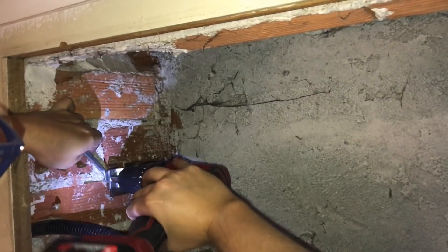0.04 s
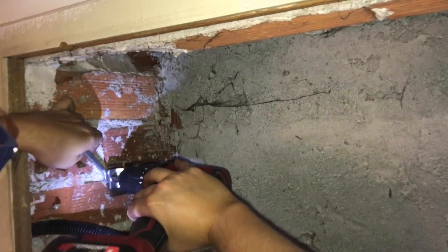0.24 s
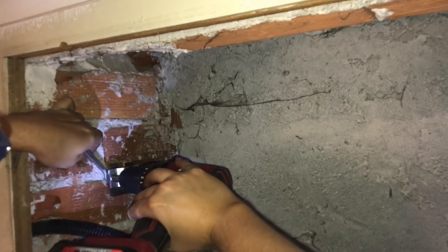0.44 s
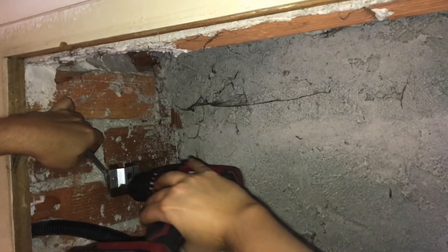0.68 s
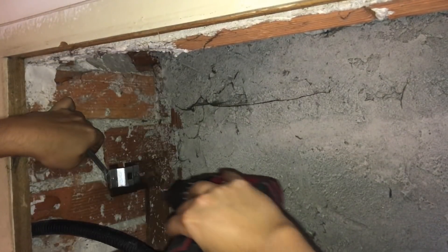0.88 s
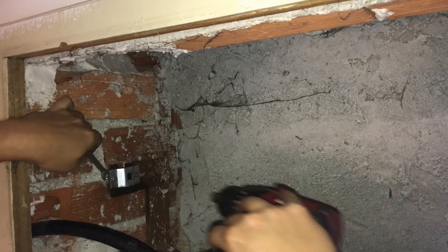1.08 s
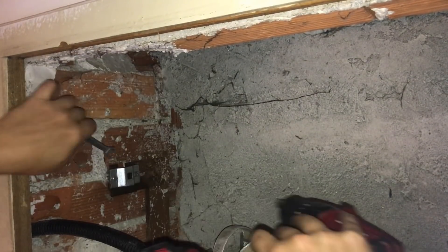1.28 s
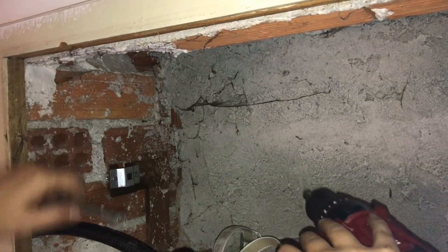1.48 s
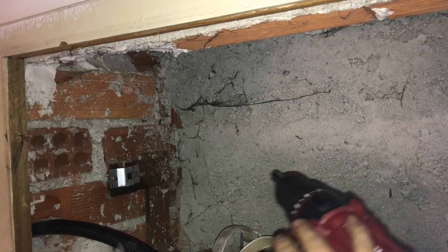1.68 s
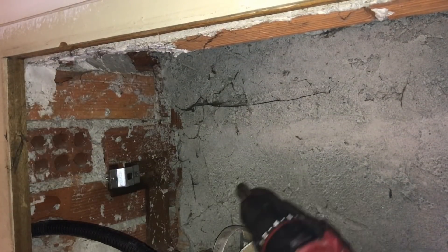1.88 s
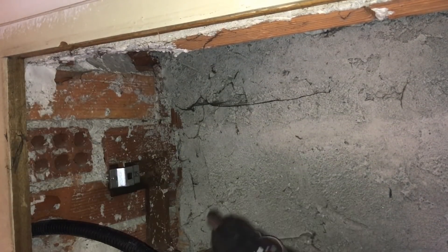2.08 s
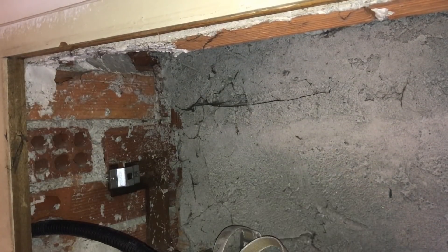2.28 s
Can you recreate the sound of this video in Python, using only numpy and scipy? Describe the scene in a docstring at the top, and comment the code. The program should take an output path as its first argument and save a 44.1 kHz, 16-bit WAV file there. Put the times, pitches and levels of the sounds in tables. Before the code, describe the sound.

Close up in a small bare room, a cordless impact driver rattles loudly for a moment and winds down with soft thuds. A screwdriver then clinks twice against a metal wall box, and tools knock and tap lightly.

```python
"""Impact driver on a metal wall box

A cordless driver whines, hammers a screw home for under half a second and runs down, then is pulled
away with dull bumps. A steel screwdriver clinks twice off the box, the driver's plastic body knocks,
and dry taps follow as the tools are put down: each hit is a noise crack over ringing modes.
Heard close up in a small bare masonry room with a low rumble."""
import sys
import numpy as np
from scipy import signal
from scipy.fft import rfft, irfft, next_fast_len
from scipy.io import wavfile
from scipy.ndimage import uniform_filter1d

SR = 44100
rng = np.random.default_rng(int(sys.argv[2]) if len(sys.argv) > 2 else 0)


def pcm_store(signal):
    """Save signal as 16-bit PCM."""
    levels = np.round(np.clip(np.atleast_2d(signal), -1, 1) * 32767)
    wavfile.write(sys.argv[1], SR, levels.astype(np.int16).T)


N = 108045

# hammer speed at full run: t/s, blow rate/Hz
BLOW_RATE = [(.2445, 100.6), (.289, 113.9), (.402, 131.8), (.474, 132.4), (.499, 111.8), (.564, 66.3),
             (.57, 60)]
# low modes of the wall: f/Hz, level/dB, t60/s
WALL_MODES = [(117, -15.5, 0.065), (200, -3.5, 0.07), (260.8, -7.5, 0.078), (350, -11, 0.084)]
# colour of a steel contact crack: f/Hz, level/dB
STEEL_CRACK = [(60, -44), (1000, -7.5), (3500, 0.5), (5000, -15.5), (6800, 4.5), (9000, 1), (11500, -4.5),
               (13500, -5), (16000, -6)]


def hammer():
    """The hammer crashes on the anvil and rebounds, thumping the wall; the loose bit chatters."""
    # strength of the blows: t/s, level/dB
    effort = [(.24, 0), (.3, 0), (.4, -1), (.47, -0.5), (.52, -2), (.57, -5)]
    # lone blows as the hammer catches and runs down: t/s, level/dB
    stray_blows = [(0.2112, 0.5), (0.2269, -4.5), (0.2317, -.5), (0.241, -1), (0.5461, -4), (0.575, -9),
                   (0.5833, -5.5), (0.5998, -21), (0.6081, -8)]
    # colour of one crash: f/Hz, level/dB
    crash_colour = [(40, -43), (170, -20.5), (620, -11.5), (1050, -15.5), (1300, -3.5), (1680, -10.5),
                    (2300, -3.5), (2800, -4), (3500, -1.5), (4950, -9), (5450, -3.5), (7400, -10.5),
                    (8600, -5), (10000, -13), (12000, -10.5), (15800, -18)]
    # modes of anvil and bit: f/Hz, level/dB, t60/s
    anvil_modes = [(1866, -6, 0.046), (2200, -10, 0.046), (2770, 1, 0.021), (3385, -5.5, 0.023),
                   (3785, -5.5, 0.018), (3970, -8, 0.026), (4340, -12.5, .025), (5500, -11, 0.01),
                   (6244, -11.5, 0.035), (8430, -8.5, .012)]
    rise_s, jitter_s, scatter_db = .0012, .00004, .8
    crash_db, rebound_db, anvil_db, wall_db = -12.4, -7, -18, -42.5
    repeat_share = .74  # part of the crash's power that is alike on every blow
    count, running = blow_count()
    times = np.interp(np.arange(int(count[-1]) + 1), count[running], np.flatnonzero(running) / SR)
    times += jitter_s * rng.standard_normal(len(times))
    blow_db = np.interp(times, *np.array(effort).T) + scatter_db * rng.standard_normal(len(times))
    # one softer, uneven chatter after each full-run blow
    lag_s = rng.uniform(.003, .0065, len(times))
    chatter_db = blow_db - 6 + 3 * rng.standard_normal(len(times))
    chatter = play(times + lag_s, undb(chatter_db), burst(0, rise_s / 2, fall_s=.0013))
    stray_s, stray_db = np.array(stray_blows).T
    times, gains = np.r_[times, stray_s], undb(np.r_[blow_db, stray_db])
    rebound = undb(rebound_db) * burst(.0051, rise_s / 2, fall_s=.0023)
    envelope = burst(0, rise_s, fall_s=.0023) + rebound
    repeated = np.sqrt(repeat_share) * play(times, gains, flatten(envelope * white()))
    fresh = np.sqrt(1 - repeat_share) * play(times, gains, envelope) * white()
    body = undb(anvil_db) * ring(anvil_modes) + undb(wall_db) * ring(WALL_MODES)
    crashes = colour(repeated + fresh + chatter * white(), crash_colour)
    return undb(crash_db) * crashes + play(times + rise_s / 2, gains, body)


def blow_count():
    """Running count of blows, and a gate that is open during the full run."""
    t = np.arange(N) / SR
    running = (t >= BLOW_RATE[0][0]) & (t <= BLOW_RATE[-1][0])
    return np.cumsum(curve(BLOW_RATE) * running) / SR, running


def housing_drone():
    """Steady hammering shakes the housing: clean harmonics that rise and swell with speed."""
    # housing harmonics: multiple of the blow rate, level/dB
    harmonics = [(1, -13.5), (2, -6), (3, -7.5), (4, -16), (5, -6), (6, -2), (7, -4)]
    top_speed_db, db_per_octave = -30.5, 30
    count, running = blow_count()
    rate = curve(BLOW_RATE)
    swell = running * undb(top_speed_db + db_per_octave * np.log2(rate / rate.max()))
    tone = sum(undb(db) * np.sin(2 * np.pi * (k * count + rng.random())) for k, db in harmonics)
    return uniform_filter1d(swell, size=800) * tone


def jolts():
    """The driver kicks against the wall and sets it ringing."""
    # kicks: t/s, level/dB
    kicks = [(.378, -18), (.565, -26), (.628, -32)]
    times, db = np.array(kicks).T
    return play(times, undb(db), ring(WALL_MODES))


def motor():
    """The windings whine in steps until the motor spins; the gears grind and coast to rest."""
    # whine as the trigger is eased in: t/s, f/Hz, level/dB
    whine_steps = [(0, 5390, -60), (.016, 6130, -62.5), (0.046, 5160, -57.5), (0.099, 5500, -56),
                   (0.116, 5770, -56.5), (0.168, 5200, -51.5), (.18, 5830, -50)]
    # swell of the grind: t/s, level/dB
    gear_level = [(.17, -76), (.19, -48), (.205, -49.5), (.235, -34), (.48, -47), (.58, -27), (.62, -36),
                  (.66, -47), (.74, -57.5), (.81, -66), (.87, -120)]
    # colour of the grind: f/Hz, level/dB
    gear_colour = [(80, -18), (140, -0.5), (280, 4), (600, -3.5), (1500, -6.5), (6000, -14.5), (15000, -35)]
    whine_end_s, octave_db, pitch_jitter = .21, -12.5, .004
    t = np.arange(N) / SR
    starts, hz, db = np.array(whine_steps).T
    step = np.searchsorted(starts, t, side="right") - 1
    phase = 2 * np.pi * np.cumsum(hz[step] * (1 + pitch_jitter * flutter(samples=60))) / SR
    tone = np.sin(phase) + undb(octave_db) * np.sin(2 * phase)
    whine = undb(db[step]) * (t < whine_end_s) * tone
    return whine + undb(curve(gear_level)) * colour(white(), gear_colour)


def shaft_clink():
    """The screwdriver's steel shaft touches twice, then rings brightly."""
    # contacts: t/s, ring/dB, crack/dB, crack fall/s, tilt/(dB per octave)
    contacts = [(1.2503, -38, -52, 0.003, -3), (1.258, -37.5, -46, 0.0019, -6.5),
                (1.2738, -23.5, -37.5, 0.0044, -3)]
    # shaft modes: f/Hz, level/dB, t60/s
    modes = [(4062, -10, 0.091), (5260, 0.5, 0.023), (5900, 2, 0.014), (5710, 3, 0.016), (5980, -9, 0.077),
             (6430, -13.5, 0.05), (6848, -24.5, .06), (9250, -10, 0.025), (10900, -14, 0.021),
             (12400, -19, 0.04), (14700, -19, .048)]
    return hits(contacts, modes, STEEL_CRACK, rise_s=.0014)


def box_clink():
    """The metal box rings under the screwdriver: a graze, then a sharp hit."""
    # contacts: t/s, ring/dB, crack/dB, crack fall/s, tilt/(dB per octave)
    contacts = [(1.3168, -49, -38, 0.0042, -8), (1.3673, -28, -27.5, 0.0047, -0.5)]
    # box modes: f/Hz, level/dB, t60/s
    modes = [(1248, -23.5, 0.11), (3280, -7, 0.011), (4230, -5, 0.033), (6230, 1.5, 0.013),
             (7080, 6, 0.025), (7040, -20.5, 0.26), (11430, 5.5, 0.017), (11550, -4, 0.022)]
    return hits(contacts, modes, STEEL_CRACK, rise_s=.0007)


def casing_knock():
    """The driver's plastic body gives one quickly damped knock."""
    # contact: t/s, ring/dB, crack/dB, crack fall/s, tilt/(dB per octave)
    contacts = [(1.9592, -43.5, -36, 0.0044, 0)]
    # casing modes: f/Hz, level/dB, t60/s
    modes = [(307, -12, 0.054), (1026, 1, 0.044), (1500, -1, 0.049), (2383, 6, 0.032), (2857, -16, 0.025),
             (3600, -10, 0.03)]
    # colour of the plastic crack: f/Hz, level/dB
    crack_colour = [(100, 1), (500, -9), (1100, 2), (2400, -3), (4000, -9), (6500, -13.5), (9000, -32),
                    (15000, -29)]
    return hits(contacts, modes, crack_colour, rise_s=.00029)


def taps():
    """The tools are put down with dry midrange taps."""
    # contacts: t/s, ring/dB, crack/dB, crack fall/s, tilt/(dB per octave)
    contacts = [(2.248, -43, -41.5, 0.0074, 1.5), (2.3125, -58, -49, 0.0056, -8.5),
                (2.3895, -81, -50.5, 0.0058, -0.5)]
    # modes of a tap: f/Hz, level/dB, t60/s
    modes = [(1026, -4.5, 0.047), (1293, 4, 0.053), (1610, -9.5, 0.053), (2126, 0.5, 0.047),
             (2524, 8, 0.012), (3750, 3.5, 0.0096)]
    # colour of its crack: f/Hz, level/dB
    crack_colour = [(300, -35), (600, -7), (1150, 7.5), (2600, 2), (3900, 1.5), (4800, -18), (6500, -12),
                    (8000, -22), (15000, -23)]
    return hits(contacts, modes, crack_colour, rise_s=.00016)


def scrapes():
    """Steel drags briefly over box and brick."""
    # strokes: t/s, level/dB, fall/s
    strokes = [(.789, -50, 0.017), (.872, -56.5, 0.01), (.904, -53, 0.016), (1.2425, -53, 0.014),
               (1.259, -46, 0.0077), (1.275, -41.5, 0.01), (1.289, -47.5, 0.025), (1.341, -52, 0.012)]
    # scrape colour: f/Hz, level/dB
    spectrum = [(250, -11), (420, -9.5), (600, 4.5), (1000, -0.5), (2000, -3.5), (3500, -11.5),
                (6000, -11.5), (12000, -33)]
    return rubs(strokes, spectrum, rise_s=.0031, grain_db=1)


def bumps():
    """Tool and hand thud softly against the wall."""
    # thuds: t/s, level/dB, fall/s
    thuds = [(.017, -39, 0.032), (.533, -22.5, 0.0089), (.575, -36, 0.083), (.64, -39, 0.033),
             (.812, -35, 0.034), (.875, -45, 0.085)]
    # bass-heavy thud colour: f/Hz, level/dB
    spectrum = [(30, -24.5), (80, -10.5), (130, 0.5), (180, -4), (260, -10), (380, -17), (600, -29),
                (2000, -48.5), (8000, -83.5)]
    return rubs(thuds, spectrum, rise_s=.0027, grain_db=-.7)


def room(x):
    """Dense reflections off bare walls; the treble dies first."""
    # decay by band: f/Hz, t60/s
    decay = [(150, 0.4), (600, 0.51), (2500, 0.27), (6000, 0.22), (14000, 0.27)]
    predelay_s, lowpass_hz = .0087, 8050
    t, hz = np.arange(SR) / SR, np.fft.rfftfreq(SR, 1 / SR)
    noise = rfft(rng.standard_normal(SR)) / np.hypot(1, hz / lowpass_hz)
    tail = np.zeros(SR)
    for band_hz, t60 in decay:
        band = by_hz([(f, float(f == band_hz)) for f, _ in decay], hz)
        tail += irfft(noise * band, SR) * np.exp(-np.log(1000) * t / t60)
    tail *= t > predelay_s
    return signal.fftconvolve(x, tail / np.sqrt(np.sum(tail ** 2)))[:N]


def background():
    """Still air, a wavering low rumble and a faint hiss after the run."""
    # colour of the still air: f/Hz, level/dB
    air_colour = [(25, -16), (65, 1.5), (130, -7.5), (300, -10.5), (600, -22), (1200, -21), (2200, -29),
                  (8000, -34.5), (15000, -34)]
    # swell of the rumble: t/s, level/dB
    rumble_level = [(0, -56), (1, -70.5), (1.4, -69.5), (1.8, -70), (2, -60.5), (2.15, -69), (2.3, -62),
                    (2.45, -54.5)]
    # swell of the hiss: t/s, level/dB
    hiss_level = [(.7, -78), (.8, -62), (.92, -64.5), (1.01, -67.5), (1.04, -97)]
    air_db, rumble_hz, width_hz = -65, 73.4, 30
    detune = 2 * (np.fft.rfftfreq(N, 1 / SR) - rumble_hz) / width_hz
    rumble = undb(curve(rumble_level)) * unit(irfft(rfft(white()) / (1 + detune ** 2), N))
    air = undb(air_db) * colour(white(), air_colour)
    hiss = undb(curve(hiss_level)) * colour(white(), [(7000, 2.5), (15000, -5)])
    return air + rumble + hiss


def hits(contacts, modes, crack_colour, rise_s):
    """Each contact cracks and rings the object's modes; its tilt sets the brightness."""
    out = np.zeros(N)
    pivot_hz = np.median([hz for hz, _, _ in modes])
    for start, ring_db, crack_db, fall_s, tilt in contacts:
        tone = ring([(hz, db + tilt * np.log2(hz / pivot_hz), t60) for hz, db, t60 in modes])
        attack = burst(0, rise_s, np.inf)[:len(tone)]
        out += play([start], undb(ring_db), tone * attack)
        spectrum = [(hz, db + tilt * np.log2(hz / pivot_hz)) for hz, db in crack_colour]
        out += undb(crack_db) * colour(burst(start, rise_s, fall_s) * white(), spectrum)
    return out


def rubs(contacts, spectrum, rise_s, grain_db):
    """Brief grainy noise bursts that die away."""
    force = sum(undb(db) * burst(start, rise_s, fall_s) for start, db, fall_s in contacts)
    grain = unit(undb(grain_db * flutter(samples=80)))
    return colour(force * grain * white(), spectrum)


def ring(modes):
    """Decaying modes after one blow; each builds up over its first cycle."""
    t = np.arange(SR // 2) / SR
    out = np.zeros(len(t))
    for hz, db, t60 in modes:
        envelope = np.minimum(hz * t, 1) * np.exp(-np.log(1000) * t / t60)
        out += undb(db) * envelope * np.sin(2 * np.pi * (hz * t + rng.random()))
    return out


def burst(start, rise_s, fall_s):
    """Envelope: straight rise, exponential fall."""
    age = np.arange(N) / SR - start
    return np.clip(age / rise_s, 0, 1) * np.exp(-np.maximum(age - rise_s, 0) / fall_s)


def play(times, gains, sound):
    """Trigger a sound at the given times."""
    train = np.zeros(N)
    np.add.at(train, np.clip(np.asarray(times) * SR, 0, N - 1).astype(int), gains)
    return signal.fftconvolve(train, sound)[:N]


def colour(x, points):
    """Minimum-phase EQ with unit power gain."""
    size = 2 * next_fast_len(N)
    gain = unit(undb(by_hz(points, np.fft.rfftfreq(size, 1 / SR))))
    cepstrum = irfft(np.log(gain))
    cepstrum[1:size // 2] *= 2
    cepstrum[size // 2 + 1:] = 0
    return irfft(rfft(x, size) * np.exp(rfft(cepstrum)))[:N]


def flatten(x, smooth_hz=400):
    """Even out the broad chance peaks in a noise burst's spectrum, keeping its energy."""
    spectrum = rfft(x)
    power = uniform_filter1d(np.abs(spectrum) ** 2, size=int(smooth_hz * N / SR))
    return irfft(spectrum * np.sqrt(power.mean() / power), N)


def white():
    """Noise of rms 1."""
    return rng.standard_normal(N)


def flutter(samples):
    """Smoothed noise of rms 1."""
    return unit(uniform_filter1d(white(), size=samples))


def curve(points):
    """A control joined by straight lines in time."""
    return np.interp(np.arange(N) / SR, *np.array(points).T)


def by_hz(points, hz):
    """Read a table on a log-frequency axis."""
    f, values = np.array(points).T
    return np.interp(np.log(np.maximum(hz, 1)), np.log(f), values)


def undb(db):
    """Decibels to gain."""
    return 10 ** (np.asarray(db) / 20)


def unit(x):
    """Scale to rms 1."""
    return x / np.sqrt(np.mean(x ** 2))


def scene():
    """Driver and tools feed the room; bumps and background stay dry."""
    send_db = -15.5
    driver = hammer() + housing_drone() + jolts() + motor()
    tools = shaft_clink() + box_clink() + casing_knock() + taps() + scrapes()
    direct = driver + tools
    return (direct + bumps() + room(undb(send_db) * direct) + background())[None]


def record(dry):
    """A steep low-pass cuts the top at 16 kHz."""
    return signal.sosfilt(signal.ellip(10, .2, 80, 16000, fs=SR, output="sos"), dry)


dry = scene()
out = record(dry)
pcm_store(out)
```